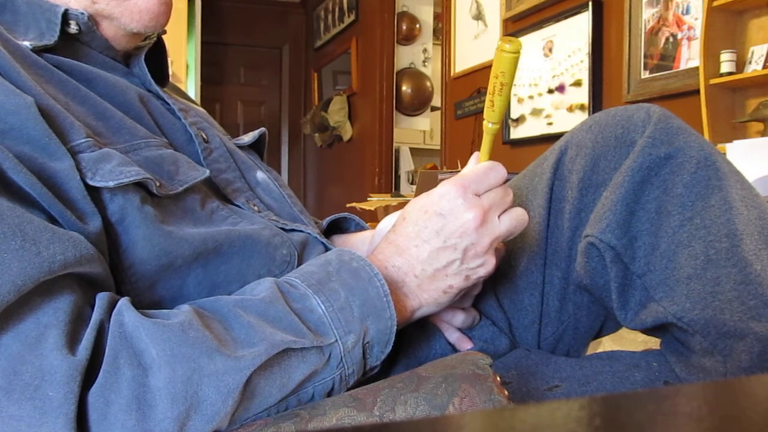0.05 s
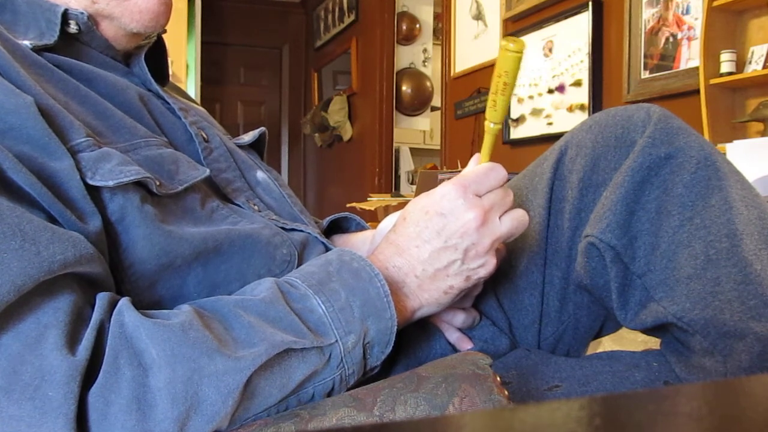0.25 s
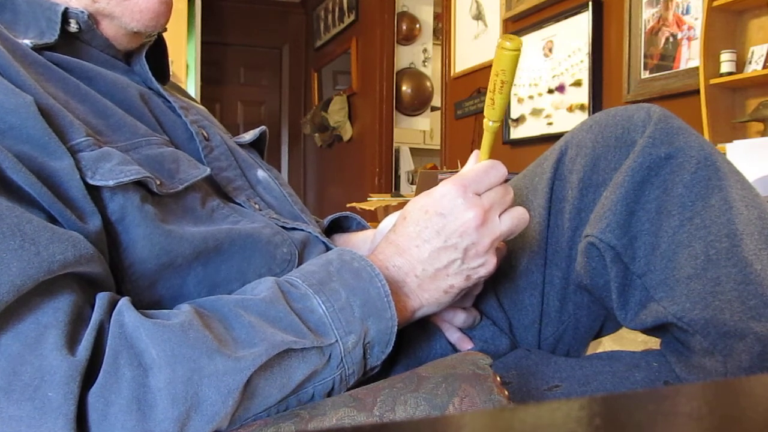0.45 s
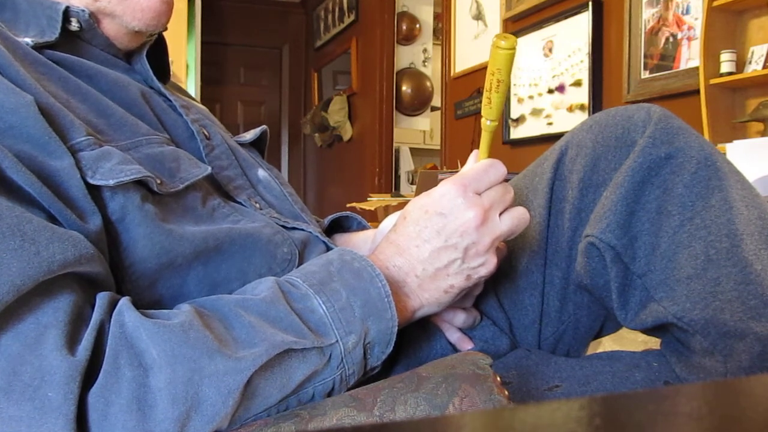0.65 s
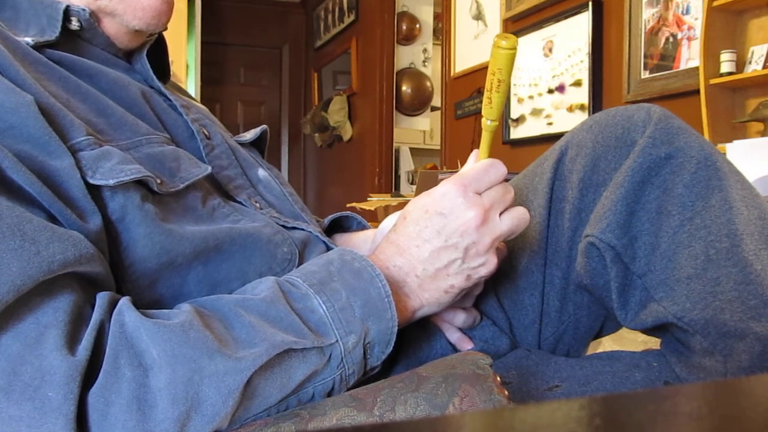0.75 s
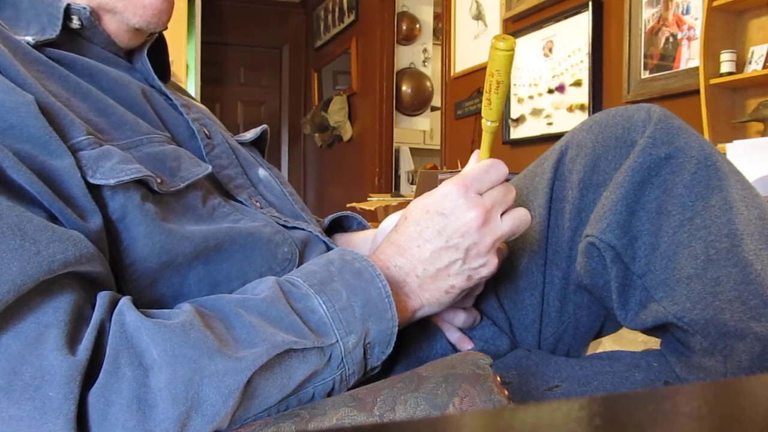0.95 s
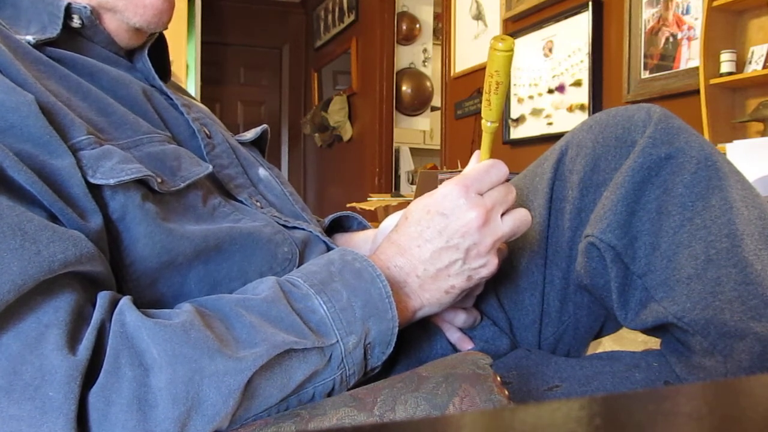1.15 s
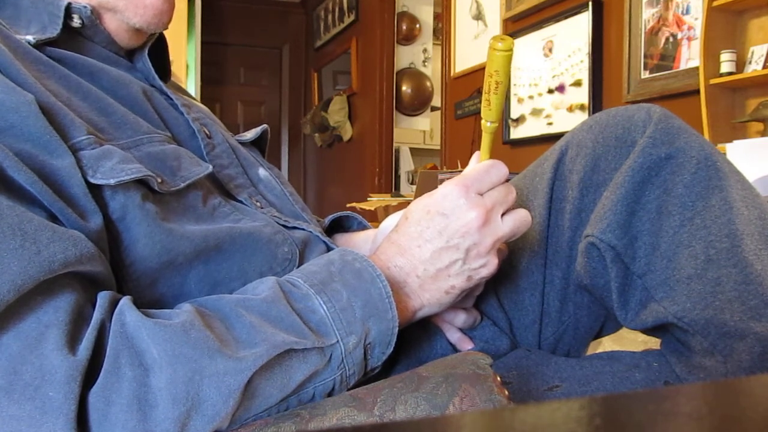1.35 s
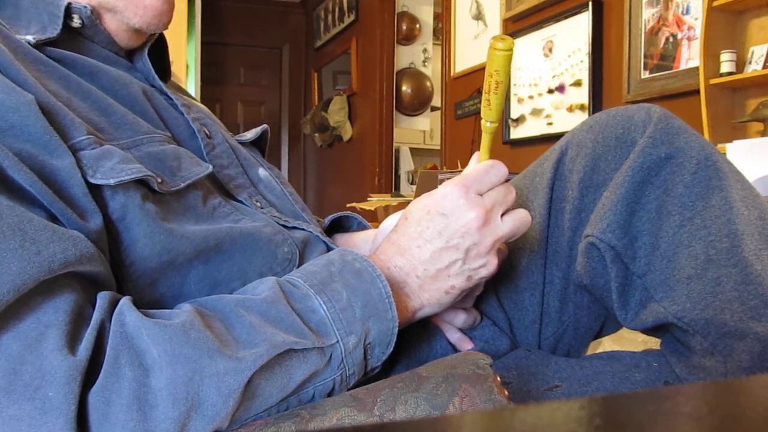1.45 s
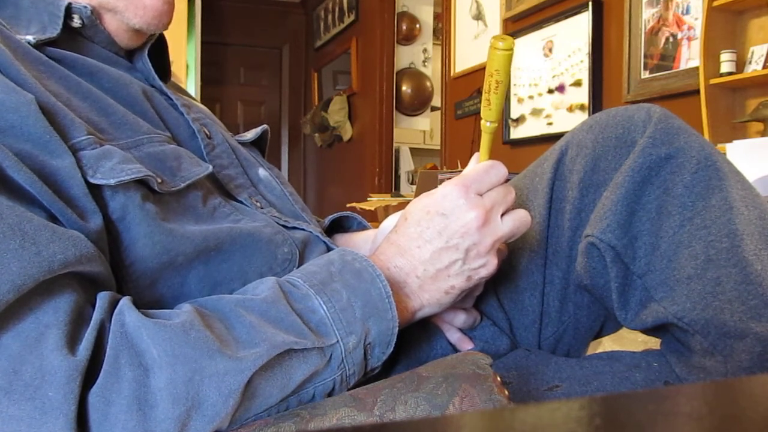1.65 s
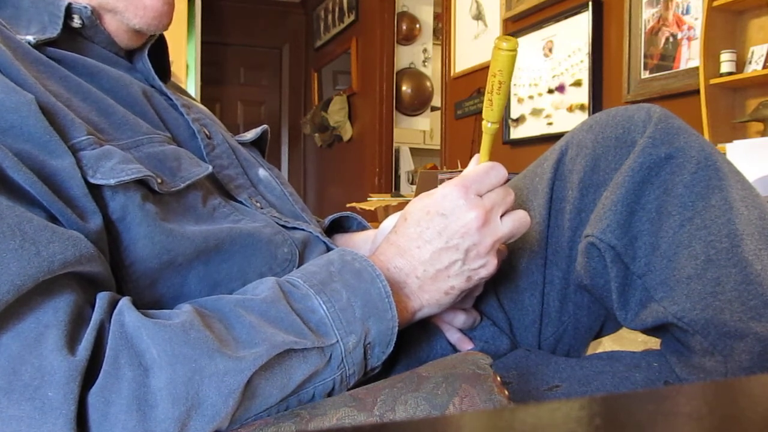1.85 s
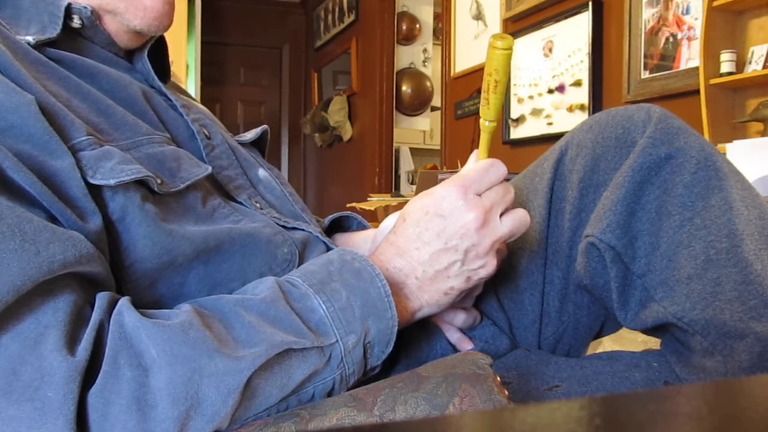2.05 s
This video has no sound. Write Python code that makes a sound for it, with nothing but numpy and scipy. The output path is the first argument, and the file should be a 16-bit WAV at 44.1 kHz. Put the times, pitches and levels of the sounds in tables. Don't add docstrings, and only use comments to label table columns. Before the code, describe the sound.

Friction turkey call: a tap, one loud sharp cluck, then a soft stuttering purr that strengthens

```python
import sys
import numpy as np
from scipy import signal
from scipy.fft import rfft, irfft, next_fast_len
from scipy.io import wavfile
from scipy.ndimage import uniform_filter1d, map_coordinates

SR = 44100
rng = np.random.default_rng(int(sys.argv[2]) if len(sys.argv) > 2 else 0)


def output_pcm(signal):
    pcm = np.clip(np.atleast_2d(signal).T, -1, 1) * 32767
    wavfile.write(sys.argv[1], SR, np.round(pcm).astype(np.int16))


def volts_from_db(level):
    exponent = np.asarray(level, float) / 20
    return 10 ** exponent


N = 94815
LEAD = SR // 2
M = N + LEAD

# f/Hz, density/dB
HUM_SPECTRUM = [(15, -54), (25, -22.5), (48, -6), (81, -9), (202, 2), (943, -13.5), (996, -13), (2000, -22),
                (2600, -46), (4400, -120)]
HISS_SPECTRUM = [(900, -25.5), (1500, 0), (2100, 0.5), (5700, -5.5), (7500, -15.5), (9500, -17.5),
                 (13400, -13.5), (14200, -34)]
# t/s, level/dB
HUM_SWELL = [(0, 0.5), (1.75, -.5), (1.95, 0), (2.15, 0.5)]
# f/Hz, rms level/dB
WHINE_TONES = [(60, -74), (120, -71.5), (937, -74.5)]
# f/Hz, width/Hz, rms level/dB
MOTOR_BANDS = [(10130, 430, -78), (11100, 350, -80), (11930, 330, -84.5), (13300, 250, -93)]
# f/Hz, correlation/1
LIKENESS = [(60, 0.68), (240, 0.81), (500, 0.71), (950, 0.33), (3800, .12), (15000, .27)]
# t/s, gain/dB
GAIN_RECOVERY = [(0, -0.5), (.5, -1), (1.1, 1.5), (2.15, 6)]
# f/Hz, t60/s
ROOM_DECAY = [(700, 0.15), (1000, 0.33), (1500, .2), (2200, 0.32), (4500, .2), (12000, 0.23)]
# t/s, peak level/dB
TAPS = [
    (0.129, -29),
    (1.252, -33.5),
]
# f/Hz, level/dB, t60/s
TAP_MODES = [(1010, -1.5, .035), (1330, -1.5, .025), (1950, -17.5, 0.012)]
# f/Hz, width/Hz, level/dB
POT_MODES = [(881, 51, 1.5), (1322, 79.5, 1.5), (1530, 180, -0.5), (2050, 87, -8.5), (2230, 119.3, -13),
             (2430, 160, -9), (3027, 80, -16.5), (3404, 150, -25.5), (4440, 76, -16), (4560, 180, -32.5),
             (6040, 547, -37), (7990, 1500, -61), (11900, 4500, -52.5)]
# f/Hz, width/Hz, level/dB
SCRAPE_BANDS = [(1347, 170, -1), (1000, 130, 3), (1950, 140, -9), (2430, 120, -11)]
FIZZ_BANDS = [(3350, 1100, -25), (4240, 900, -21.5), (6760, 2100, -29.5), (12000, 2100, -39.5)]
# t/s, buzz level/dB, pitch f/Hz, mode level/dB, mode f/Hz
CLUCK = [
    (0.204, -58, 736, -38, 1040),
    (0.209, -46, 736, -19.5, 1024),
    (.214, -33.5, 735.4, -12, 1000),
    (.218, -29, 724, -10.5, 956),
    (0.219, -12, 733, -23.5, 928),
    (0.238, -14.5, 726, -28.5, 934),
    (.248, -18, 641, -33, 944),
    (.253, -32.5, 640, -32.5, 940),
    (.26, -76, 630, -58, 940),
]
# start t/s, length/s, buzz level/dB, pitch f/Hz, mode level/dB
PURR = [(1.358, 0.025, -35, 670, -45.5), (1.371, 0.047, -36, 758, -56), (1.419, 0.0233, -30, 779, -53),
        (1.436, 0.037, -36.5, 824, -45), (1.473, 0.029, -30, 807.6, -37.5), (1.498, 0.034, -37, 858, -41.5),
        (1.514, .046, -31, 837, -38), (1.57, 0.0453, -29.5, 809.4, -39), (1.616, 0.015, -42.5, 866, -58),
        (1.668, .026, -31.5, 805, -34.5), (1.684, 0.035, -22.5, 811, -41),
        (1.728, 0.025, -22.5, 812.7, -31), (1.769, .034, -23.5, 847.8, -33),
        (1.799, 0.021, -25.5, 860, -44), (1.808, .026, -16.5, 797, -69), (1.82, 0.02, -33, 826, -45),
        (1.848, 0.022, -18, 832.3, -39), (1.872, 0.046, -34, 876, -66), (1.925, 0.03, -43, 909, -66.5),
        (1.971, 0.083, -57, 905, -75)]

HUM_DB, HISS_DB = -57.5, -62.5
ROOM_DB, PREDELAY_S, ROOM_LIKENESS = -10, 0.0065, 0.29
LINGER_DB, LINGER_LONGER = -15.5, 2.1
PAN_DB, LAG_S = -2, 3e-5
TAP_RISE_S = 0.0007
BRIGHT_PER_DB, LOUD_DB = 0.5159, -17
JITTER, FLUTTER_DB = 0.006, 1.5
MODE_JITTER, MODE_FLUTTER_DB = 0.015, 2.5
MODE_OCTAVE_DB, MODE_RASP = -17.5, 0.53
SCRAPE_DB, FIZZ_GROWS = 3.5, 1.3
POT_LOW_HZ = 743.6
CLUCK_ROUGH = 0.25
EARLIER_S, EARLIER_DB, EARLIER_MODE_DB, EARLIER_PITCH = -0.38, -1, -17, 0.955
SWELL, EARLY_PEAK = 0.69, 0.74
GLIDE_HZ_PER_S, DIP_HZ, PURR_MODE_HZ = 250, 60, 1040
PURR_SHINE_DB, PURR_RASP_DB = 2, -2.5
BEND, BEND_LOW_HZ = 0.11, 190


def unit(x):
    return x / np.sqrt(np.mean(x ** 2) + 1e-20)


def along(points, hz):
    f, v = np.transpose(points)
    return np.interp(np.log(hz + 1), np.log(f + 1), v)


def wobble(n, rate):
    return map_coordinates(rng.standard_normal(400), [2 + np.arange(n) * rate / SR])


def filtered(x, response):
    m = next_fast_len(x.shape[-1] + SR // 2)
    spectrum = rfft(x, m) * response(np.fft.rfftfreq(m, 1 / SR))
    return irfft(spectrum, m)[..., :x.shape[-1]]


def resonant(x, peaks):
    def response(f):
        total = 0
        for k, (hz, width, db) in enumerate(peaks):
            damping = 1j * f * width
            total = total + (-1) ** k * volts_from_db(db) * damping / (hz * hz - f * f + damping)
        return total
    return filtered(x, response)


def diffuse_noise(spectrum):
    def response(hz):
        turn = np.arccos(np.clip(along(LIKENESS, hz), -1, 1)) / 2
        return volts_from_db(along(spectrum, hz)) * [np.cos(turn), np.sin(turn)]
    mid, side = filtered(rng.standard_normal((2, N)), response)
    return unit(np.array([mid + side, mid - side]))


def motor_whirr():
    whirr = 0
    for hz, w, db in MOTOR_BANDS:
        skirt = [(hz - 2 * w, -30), (hz - w / 2, -5), (hz, 0),
                 (hz + w / 2, -5), (hz + 2 * w, -30), (hz + 4 * w, -60)]
        whirr = whirr + volts_from_db(db) * diffuse_noise(skirt)
    return whirr


def background():
    t = np.arange(N) / SR
    whine = np.zeros(N)
    for hz, db in WHINE_TONES:
        whine += volts_from_db(db + 1.5 * wobble(N, 3)) * np.sqrt(2) * np.sin(2 * np.pi * hz * t)
    hum_db = HUM_DB + np.interp(t, *np.transpose(HUM_SWELL)) + 0.95 * wobble(N, 6.8)
    hum = volts_from_db(hum_db) * diffuse_noise(HUM_SPECTRUM) * volts_from_db([[-0.6], [0.6]])
    hiss = volts_from_db(HISS_DB) * diffuse_noise(HISS_SPECTRUM)
    gain = volts_from_db(np.interp(t, *np.transpose(GAIN_RECOVERY)))
    return gain * (hum + hiss + motor_whirr() + whine)


def room(x):
    hz, t, z = signal.stft(rng.standard_normal((2, SR // 2)), SR, nperseg=256)
    fall_db = -60 * t / along(ROOM_DECAY, hz)[:, None]
    decay = volts_from_db(fall_db) + volts_from_db(LINGER_DB + fall_db / LINGER_LONGER)
    a, b = signal.istft(z * decay, SR, nperseg=256)[1]
    turn = np.arccos(ROOM_LIKENESS) / 2
    tail = np.cos(turn) * a + np.sin(turn) * np.array([b, -b])
    delayed = np.pad(x, (round(PREDELAY_S * SR), 0))
    return signal.fftconvolve(delayed[None], tail / np.linalg.norm(a), axes=1)[:, :M]


def add_taps(tone):
    t = np.arange(SR // 10) / SR
    contact = 1 - np.exp(-(t / TAP_RISE_S) ** 2)
    ring = sum(volts_from_db(db - 60 * t / t60) * np.sin(2 * np.pi * hz * t) for hz, db, t60 in TAP_MODES)
    for start, db in TAPS:
        tone[LEAD + round(start * SR):][:len(t)] += volts_from_db(db - 2.0) * ring * contact


def slip_stack(turn, pitch_hz, buzz_db, rough, shine_db):
    n, k = len(buzz_db), np.arange(1, 21)[:, None]
    pot_power = 0
    for hz, width, db in POT_MODES:
        pot_power = pot_power + (volts_from_db(db) / (1 + ((k * pitch_hz - hz) / width) ** 2)) ** 2
    level = buzz_db + BRIGHT_PER_DB * np.sqrt(k - 1) * (buzz_db - LOUD_DB)
    level = level + shine_db * (k > 3) + rough * FLUTTER_DB * wobble(n, 200)
    phase = 2 * np.pi * rng.random(k.shape)
    return np.sum(np.sqrt(pot_power) * volts_from_db(level) * np.sin(k * turn + phase), axis=0)


def pot_mode(mode_db, mode_hz, rough):
    n = len(mode_db)
    swing = 2 * np.pi * np.cumsum(mode_hz * (1 + rough * MODE_JITTER * wobble(n, 120))) / SR
    octave = volts_from_db(MODE_OCTAVE_DB + BRIGHT_PER_DB * (mode_db - LOUD_DB))
    level = volts_from_db(mode_db + rough * MODE_FLUTTER_DB * wobble(n, 150))
    return level * (np.sin(swing) + octave * np.sin(2 * swing))


def add_slip(tone, rasp, s, buzz_db, pitch_hz, mode_db, mode_hz, rough, shine_db=0, rasp_db=0):
    n = len(buzz_db)
    turn = 2 * np.pi * np.cumsum(pitch_hz * (1 + rough * JITTER * wobble(n, 150))) / SR
    stack = slip_stack(turn, pitch_hz, buzz_db, rough, shine_db)
    mode = pot_mode(mode_db, mode_hz, rough)
    at = LEAD + round(s * SR)
    tone[at:at + n] += np.sqrt(2) * (stack + mode)
    rasp_level = volts_from_db(rasp_db) * (volts_from_db(buzz_db) + MODE_RASP * volts_from_db(mode_db))
    rasp[at:at + n] += rasp_level * (1 + np.cos(turn)) * rng.standard_normal(n)


def add_purr(tone, rasp):
    for start, length, buzz_db, pitch_hz, mode_db in PURR:
        t = np.arange(round(length * SR)) / SR
        press = np.abs(np.sin(np.pi * (t / length) ** EARLY_PEAK))
        swell = 20 * SWELL * np.log10(press + 1e-3)
        glide = GLIDE_HZ_PER_S * (t - length / 2) + DIP_HZ * (t / length) ** 3
        add_slip(tone, rasp, start, buzz_db + swell, pitch_hz + glide, mode_db + swell,
                 PURR_MODE_HZ, 1, PURR_SHINE_DB, PURR_RASP_DB)


def add_clucks(tone, rasp):
    s, *cols = np.transpose(CLUCK)
    t = s[0] + np.arange(round((s[-1] - s[0]) * SR)) / SR
    buzz, pitch, mode, mode_hz = [np.interp(t, s, c) for c in cols]
    add_slip(tone, rasp, s[0], buzz, pitch, mode, mode_hz, CLUCK_ROUGH)
    add_slip(tone, rasp, s[0] + EARLIER_S, buzz + EARLIER_DB, pitch * EARLIER_PITCH,
             mode + EARLIER_MODE_DB, mode_hz, CLUCK_ROUGH)


def pot_call():
    tone, rasp = np.zeros(M), np.zeros(M)
    add_taps(tone)
    add_purr(tone, rasp)
    add_clucks(tone, rasp)
    strength = np.sqrt(np.abs(uniform_filter1d(rasp ** 2, size=200))) / volts_from_db(LOUD_DB)
    scrape = resonant(rasp, SCRAPE_BANDS)
    fizz = resonant(rasp * strength ** (FIZZ_GROWS - 1), FIZZ_BANDS)
    high_pass = signal.butter(12, POT_LOW_HZ, "high", fs=SR, output="sos")
    return signal.sosfilt(high_pass, tone + volts_from_db(SCRAPE_DB) * (scrape + fizz))


def scene():
    pot = pot_call()
    side = np.array([[1], [-1]])
    near = filtered(pot, lambda hz: np.exp(-1j * np.pi * side * hz * LAG_S))
    heard = (near + volts_from_db(ROOM_DB) * room(pot))[:, LEAD:]
    return volts_from_db(side * PAN_DB / 2) * heard + background()


def top_cut(x):
    return signal.sosfilt(signal.butter(12, 15720, fs=SR, output="sos"), x)


def record(dry):
    square = filtered(dry ** 2, lambda hz: 1 / (1 + (BEND_LOW_HZ / (hz + 1)) ** 4))
    bent = dry + BEND * square
    return top_cut(bent)


dry = scene()
out = record(dry)
output_pcm(out)
```